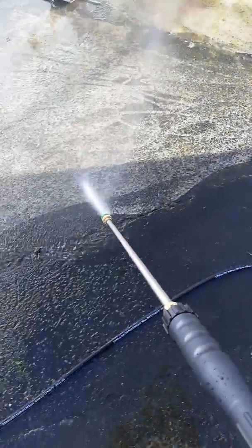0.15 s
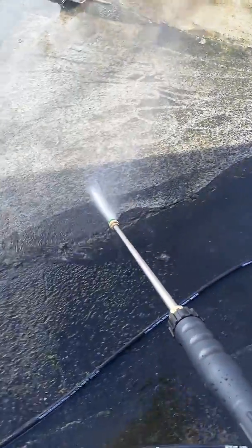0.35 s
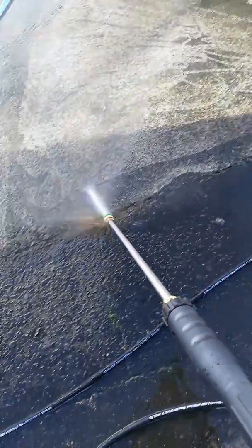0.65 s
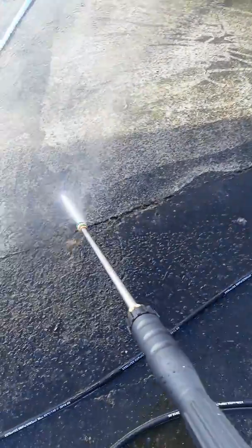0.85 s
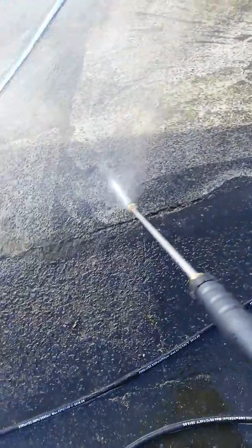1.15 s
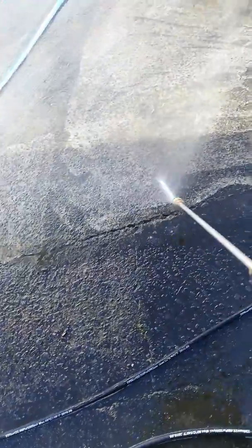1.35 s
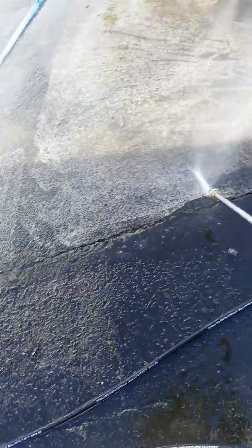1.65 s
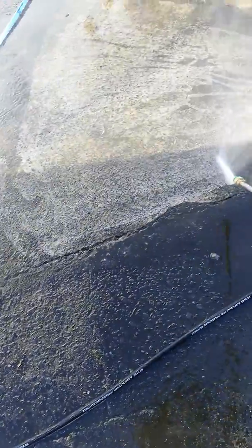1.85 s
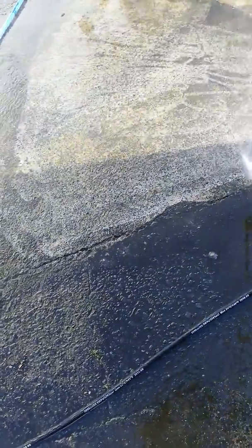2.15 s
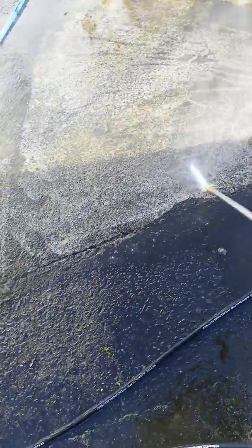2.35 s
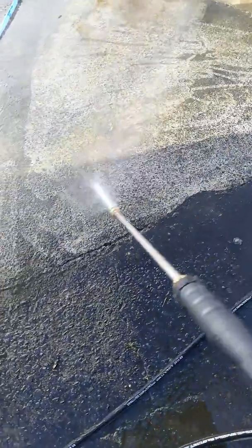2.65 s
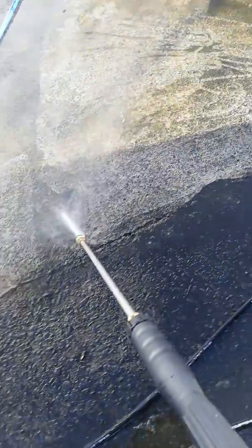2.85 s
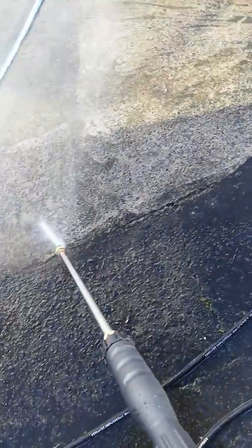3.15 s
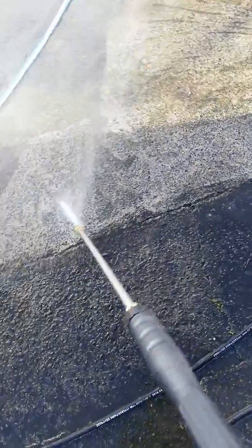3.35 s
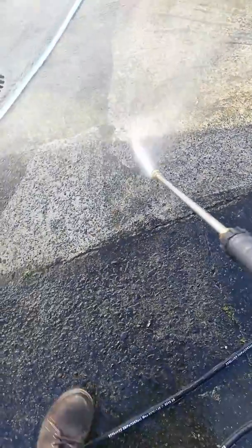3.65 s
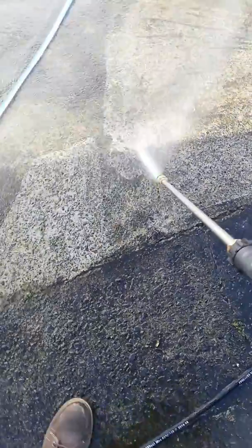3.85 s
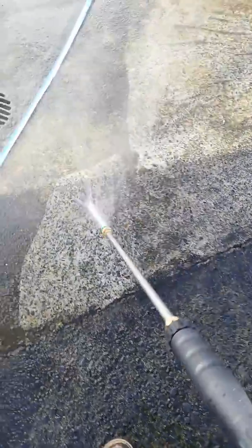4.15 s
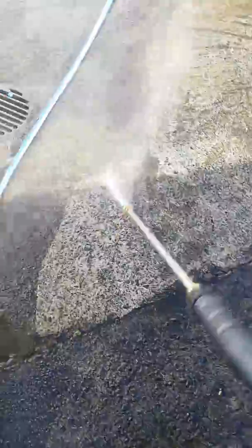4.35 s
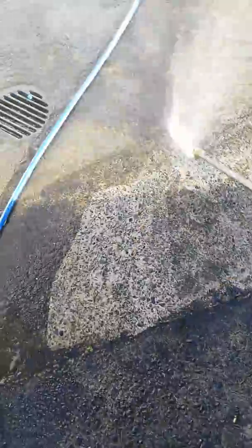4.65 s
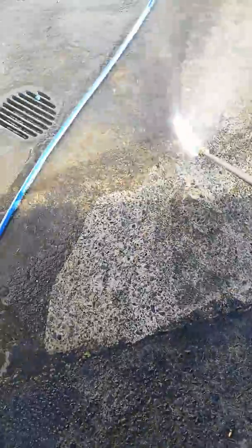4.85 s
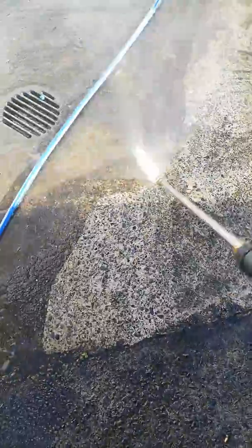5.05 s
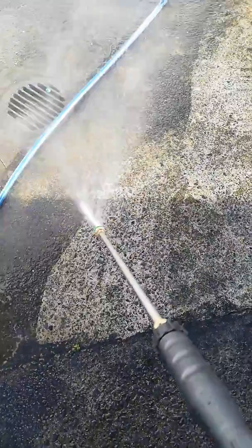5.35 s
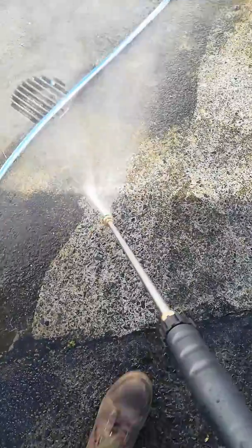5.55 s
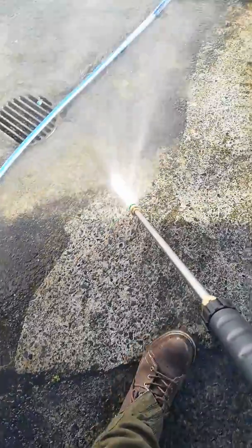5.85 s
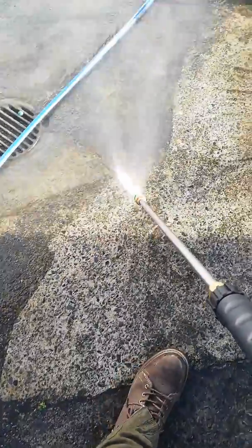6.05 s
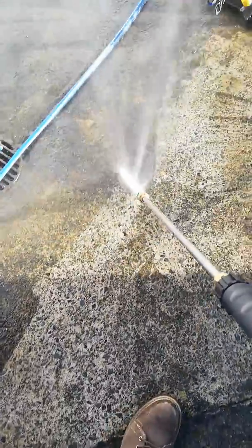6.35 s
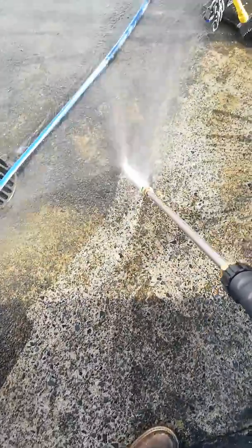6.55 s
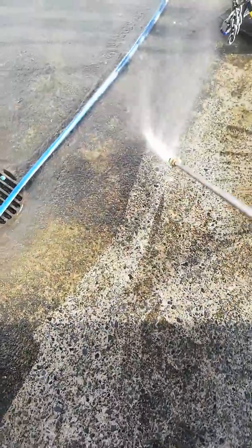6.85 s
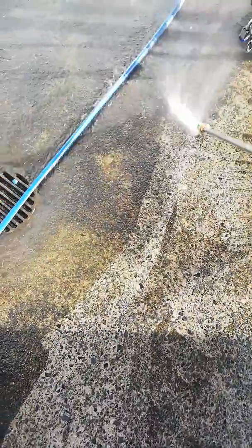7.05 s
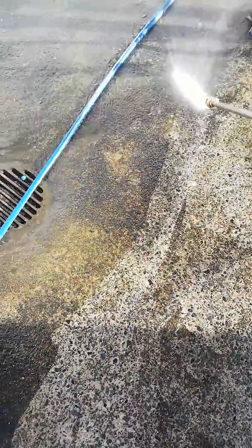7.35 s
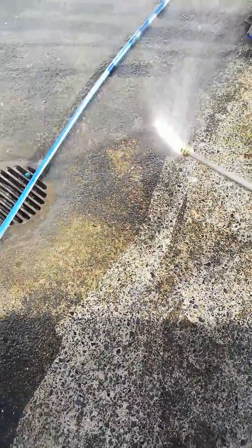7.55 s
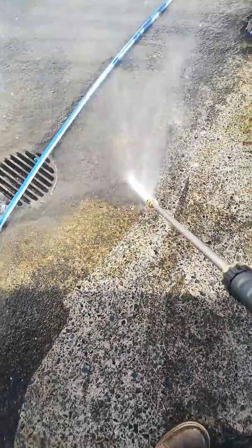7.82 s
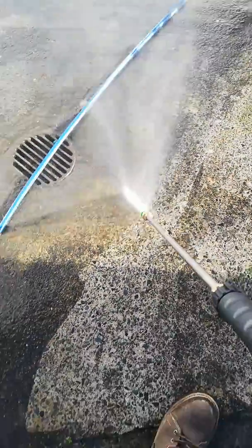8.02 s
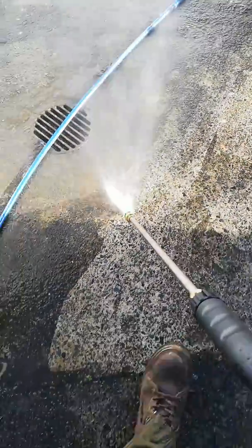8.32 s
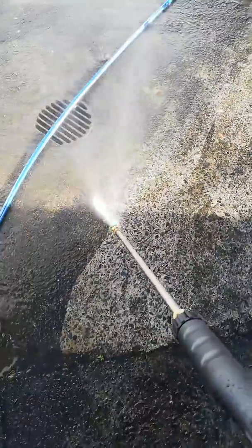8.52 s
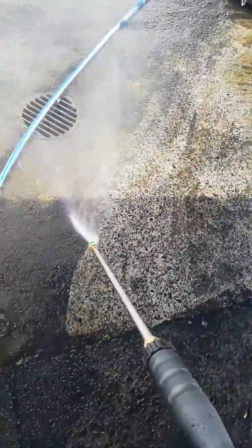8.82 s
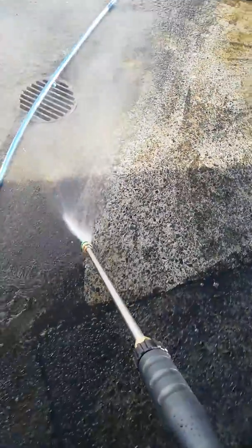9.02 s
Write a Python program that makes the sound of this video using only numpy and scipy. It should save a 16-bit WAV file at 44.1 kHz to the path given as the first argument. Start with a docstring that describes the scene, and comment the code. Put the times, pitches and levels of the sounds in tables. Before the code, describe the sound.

A pressure washer jet hisses loudly over wet concrete while its petrol engine drones and rattles steadily behind it.

```python
"""The jet of a petrol pressure washer hisses and roars as it is swept over wet concrete outdoors.
Its spray is broadband noise, modulated in amplitude by the pressure ripple of the pump.
Behind it the single cylinder thumps in a harmonic series on the firing rate, while pump and valves
knock at fixed crank angles and excite the damped modes of the casing.
Two spaced microphone ports receive each source with a different colour and phase."""
import sys
import numpy as np
from scipy import signal
from scipy.io import wavfile
from scipy.ndimage import uniform_filter1d

SR = 44100
rng = np.random.default_rng(int(sys.argv[2]) if len(sys.argv) > 2 else 0)


def generate_wav(sig):
    """Save sig (samples, or channels by samples) to the path in sys.argv[1] as 16-bit PCM at SR."""
    pcm = np.round(np.clip(np.atleast_2d(sig).T, -1, 1) * 32767).astype(np.int16)
    wavfile.write(sys.argv[1], SR, pcm)


N = 404838

# Knocks in one four-stroke cycle: (position [cycles], level [dB], spectral tilt [dB/octave])
KNOCK_PATTERN = [(.05, 0, 3), (.2, -7.5, 0.5), (.31, -9, 0), (.44, -1, -4), (.57, 1.5, -0.5), (.72, 3.5, 3),
                 (.83, -5, -5.5), (.97, -2, 1.5)]
# Relation between the ports: (frequency [Hz], coherence [0-1], phase lead of the left [rad])
PORT_COHERENCE = [(100, .99, .05), (300, .85, .2), (700, .45, 1.7), (950, .6, .2), (1900, .55, .1),
                  (2500, .5, 2.6), (3500, .3, 3.3), (4500, .44, 4.2), (5500, .44, 5.9), (6500, .32, 7.9),
                  (7500, .2, 8.7), (8500, .27, 10.7), (10000, .24, 13.4), (12000, .14, 19.6),
                  (14000, .1, 23.2)]
# Base level of the machine as it draws nearer: (time [s], level [dB])
MACHINE_LEVEL = [(0, -27.5), (2.6, -28), (4.7, -26.5), (7.9, -26.5), (9.18, -26)]
# Low-mid swell, followed in part by exhaust buzz and spray roar: (time [s], level [dB])
LOW_MID_SWELL = [(0, -0.5), (.6, -3), (1.2, -2.5), (1.7, -6.5), (2.5, -4), (2.9, -0.5), (3.6, 1),
                 (4.8, 0.5), (6.8, 0.5), (8.4, 1.5), (9.18, 2.5)]


def gain_of(db):
    """Amplitude ratio of a level in decibels."""
    return 10 ** (np.asarray(db) / 20)


def follow(rows, t):
    """Linear interpolation of each column of a time table at the times t."""
    times, *columns = np.transpose(rows)
    return [np.interp(t, times, c) for c in columns]


def read(rows, hz):
    """Interpolation of each column of a spectrum table on a logarithmic frequency axis."""
    freqs, *columns = np.transpose(rows)
    return [np.interp(np.log(hz + 1), np.log(freqs + 1), c)[:, None] for c in columns]


def drift(shape, spans):
    """Slow random fluctuation of rms 1: noise under a double moving average along each axis."""
    x = rng.standard_normal(shape)
    for axis, span in enumerate(spans):
        x = uniform_filter1d(uniform_filter1d(x, span, axis=axis), span, axis=axis)
    return x / np.sqrt(np.mean(x ** 2) + 1e-20)


def engine_cycles():
    """Phase as the integral of speed: one four-stroke cycle for every two crank turns."""
    # The governor hunts a little: (time [s], crank speed [turns/s])
    crank_speed = [(0.0, 61.62), (0.88, 61.19), (2.27, 61.35), (2.75, 61.41), (3.19, 61.17), (3.97, 61.59),
                   (4.71, 61.22), (5.14, 61.45), (5.78, 61.26), (8.06, 61.22), (8.3, 61.19), (9.18, 61.41)]
    return .6 + np.cumsum(follow(crank_speed, np.arange(N) / SR)[0]) / SR / 2


def exhaust_harmonics(cycle):
    """Fourier series: periodic firing gives tones at whole multiples of the firing rate."""
    # Spectra facing the machine and turned away from it: (harmonic [number], level [dB])
    spectrum_facing = [(1, -12), (2, 1), (3, -11.5), (4, -34), (5, -10.5), (6, -12.5), (7, -31), (8, -11.5),
                       (9, -27.5), (10, -44), (11, -13.5), (12, -24), (13, -18), (14, -13.5), (15, -22),
                       (16, -14), (17, -22.5), (18, -14.5), (19, -15.5), (20, -12.5), (21, -13), (22, -45),
                       (23, -25.5), (24, -16), (25, -32), (26, -10), (27, -30), (28, -14), (29, -26),
                       (30, -13.5), (31, -14), (32, -8.5), (33, -35.5), (34, -48), (35, -26), (36, -21.5),
                       (37, -18), (38, -7), (39, -20), (40, -18), (41, -17), (42, -13)]
    spectrum_away = [(1, -12), (2, -1), (3, -10), (4, -34), (5, -12.5), (6, -9.5), (7, -23.5), (8, -14),
                     (9, -20), (10, -20), (11, -24), (12, -29), (13, -20.5), (14, -23), (15, -21.5),
                     (16, -23.5), (17, -14.5), (18, -26), (19, -12.5), (20, -22), (21, -33), (22, -21),
                     (23, -17), (24, -12.5), (25, -24), (26, -20), (27, -13), (28, -28), (29, -23),
                     (30, -14), (31, -33), (32, -13.5), (33, -13), (34, -35), (35, -14), (36, -10),
                     (37, -37), (38, -18.5), (39, -14.5), (40, -27), (41, -37), (42, -18)]
    # Turn toward the machine: (time [s], share [0-1])
    orientation = [(2.5, 0.2), (3.3, 0.72)]
    # Tops of the thump, two hum, drone, growl and buzz bands, below the whine: (harmonic [number])
    band_tops = [4, 5, 7, 8, 11, 23]
    # Hums near 150 and 185 Hz: (time [s], lower level [dB], upper level [dB])
    hums = [(0, -1, 0), (.6, 2.5, 1.5), (3.5, 2.5, 3), (4.1, -1.5, -9), (5, -3, -8), (5.5, -2, 0.5),
            (7, -0.5, 1), (7.4, -0.5, -3), (8.1, -2, 2), (9.18, -3, -7)]
    # Drone at 245 Hz, growl near 330 Hz and whine near 1000 Hz: (time [s], level [dB])
    drone = [(0, 9.5), (.28, 8), (.7, -7), (1.12, -12), (1.99, 5.5), (2.6, -14), (3.58, 3.5), (4.75, -1),
             (4.9, 2.5), (5.5, 4), (5.85, -2.5), (7.49, -0.5), (7.58, 4), (8.5, 2), (8.9, 6), (9.03, 0),
             (9.18, 7)]
    growl = [(0, 7.5), (.7, -5), (2.1, 5), (2.7, -4), (3.3, 2.5), (4.2, -3), (4.9, 3.5), (6.9, -6),
             (8.2, 1.5), (9.18, 8.5)]
    whine = [(0, -3), (.6, -0.5), (1.7, -2), (3.3, -1), (4.7, -1), (5.5, 4.5), (6.2, -0.5), (8.3, 1),
             (8.85, 3.5), (9.18, -0.5)]
    # Balance of the tones: (frequency [Hz], left above right [dB])
    balance = [(150, 0), (380, -2), (700, 3), (1000, 7.5), (1290, -2)]
    hop, firing_hz = 64, 30.65
    blast_position, muffler_lag_rad, muffler_smear_rad = 0.887, 1.36, 0.2766
    t = np.arange(0, N, hop) / SR
    machine_db, drone_db, growl_db, mids_db, whine_db = (
        follow(rows, t)[0] for rows in (MACHINE_LEVEL, drone, growl, LOW_MID_SWELL, whine))
    band_db = [0, *follow(hums, t), drone_db, growl_db, 0.62 * mids_db, whine_db]
    k, facing_db = np.transpose(spectrum_facing)
    facing = follow(orientation, t)[0]
    harmonic_db = np.outer(facing_db, facing) + np.outer(np.transpose(spectrum_away)[1], 1 - facing)
    depth = np.clip(0.19 * k - .4, 0, 2.0)[:, None]  # higher harmonics waver more
    waver = drift((len(t), len(k), 3), spans=(180, 1)) * depth
    balance_db = read(balance, firing_hz * k)[0]
    lead = read(PORT_COHERENCE, firing_hz * k)[1]
    # Low harmonics take their phase from the muffled blast; the upper ones peak on the knocks.
    position, knock_db, tilt = np.transpose(KNOCK_PATTERN)
    knock_gain = gain_of(knock_db + np.outer(np.log2(k / 62), tilt))
    knock_spectrum = (knock_gain * np.exp(-2j * np.pi * np.outer(k, position))).sum(axis=1)
    blast_phase = -2 * np.pi * blast_position * k + muffler_smear_rad * k ** 2 - muffler_lag_rad
    phase = np.where(k > band_tops[3], np.angle(knock_spectrum), blast_phase)
    side, out = np.array([[.5], [-.5]]), np.zeros((2, N))
    for i, band in enumerate(np.searchsorted(band_tops, k)):
        side_db = side * (balance_db[i] + waver[:, i, 1])
        gain = gain_of(machine_db + harmonic_db[i] + band_db[band] + waver[:, i, 0] + side_db)
        # Reflections shift the phase between the ports.
        skew = side * (lead[i] + 0.37 * waver[:, i, 2]).repeat(hop)[:N]
        out += gain.repeat(hop, axis=1)[:, :N] * np.cos(2 * np.pi * k[i] * cycle + phase[i] + skew)
    return np.sqrt(2) * out


def casing_resonance(cycle):
    """Modal resonance: knocks at fixed crank angles, each with a rattle, excite damped vibrations."""
    # Lower, upper and loose-part modes: (frequency [Hz], T60 [s], left level [dB], right level [dB])
    mode_groups = [
        [(1518, 0.038, -6.5, -8), (1660, 0.14, -22, -25)],
        [(1795, 0.044, 2.5, 8.5), (1860.5, 0.061, 0.5, 5.5), (1934, 0.073, -23, 9), (2043, 0.07, -30, 4.5),
         (2197, 0.03, -28, 10)],
        [(2590, .04, 6, -4), (2760, 0.034, 12, 0)],
    ]
    # Ringing relative to the machine: (time [s], lower group level [dB], upper group level [dB])
    ring_levels = [(0, -8, 1), (.9, -24, 3.5), (1.8, -2, 2), (2.7, -14, 5.5), (3.3, -31, 5.5),
                   (4.2, -17, 7.5), (4.6, -2, 3), (5.6, -11, 2.5), (6.1, 0.5, 3), (7.5, -0.5, 4.5),
                   (8.1, 1, 1.5), (8.5, -9, 0.5), (8.9, -8, 5), (9.18, -14, 1.5)]
    # The loose part buzzes in fits: (centre time [s], half length [s], relative level [dB])
    buzz_fits = [(.35, .15, -4), (1.9, 0.15, -7), (4.35, .08, -4), (4.8, .15, -3), (5.246, .1, -5),
                 (5.85, .1, -8), (7.246, 0.065, 0), (7.5, 0.12, -4), (8.2, .06, -3), (8.947, 0.18, -5)]
    t, ring_t = np.arange(N) / SR, np.arange(3000) / SR
    attack_s, antiphase_hz = 0.0013, 2400
    machine_db = follow(MACHINE_LEVEL, t)[0]
    lower_db, upper_db = follow(ring_levels, t)
    fits = sum(gain_of(db) * np.exp(-((t - centre) / half) ** 2) for centre, half, db in buzz_fits)
    position, knock_db, tilt = np.transpose(KNOCK_PATTERN)
    whole_cycles = np.arange(int(cycle[-1]) + 1)[:, None]
    jitter = rng.standard_normal((len(whole_cycles), len(position), 2))
    onsets = np.searchsorted(cycle, whole_cycles + position + .0006 * jitter[..., 0]).clip(0, N - 1)
    out = np.zeros((2, N))
    for modes, gain in zip(mode_groups, (gain_of(lower_db), gain_of(upper_db), gain_of(-6.5) + fits)):
        group = np.zeros((2, N))
        for hz, t60, *side_db in modes:
            blows = np.zeros(N)
            blows[onsets] = gain_of(knock_db + tilt * np.log2(hz / 1900) + 0.7 * jitter[..., 1])
            chatter = signal.lfilter([1], [1, -.995], blows)  # loose parts rattle on for some ms
            common, separate = rng.standard_normal((2, N)) * (0.39 + chatter)
            drive = blows + .017 * np.array([common, .6 * common + .8 * separate])
            envelope = gain_of(-60 * ring_t / t60) * (1 - np.exp(-ring_t / attack_s))
            ring = envelope * np.sin(2 * np.pi * hz * ring_t)
            port_gain = [[1], [1 if hz < antiphase_hz else -1]] * gain_of(side_db)[:, None]
            group += port_gain * signal.oaconvolve(drive, ring[None], axes=1)[:, :N]
        out += gain_of(machine_db - 1.0) * gain * group / np.std(group)
    return out


def water_jet(cycle):
    """Partly coherent noise: spray coloured by the wand's angle and modulated by the pump's ripple."""
    # Sweep of the wand: (time [s], position [-1 full left to 1 full right])
    wand_sweep = [(0, -.16), (1.1, -0.15), (1.85, 0.14), (2.6, -0.086), (3.3, -0.45), (3.85, 0.35),
                  (4.25, -0.44), (4.6, 0.42), (4.95, 0.42), (5.44, -0.43), (5.7, -.07), (6.3, 0.063),
                  (6.65, 0.15), (7, 0.6), (7.31, 0.94), (7.65, 0.56), (8, -0.26), (8.4, -0.019),
                  (8.85, -.47), (9.18, -0.061)]
    # Spray at the ports: (frequency [Hz], left level [dB], right level [dB])
    spray_spectrum = [(40, -8, -7), (130, -12, -10), (260, -3.5, -6.5), (400, -14.5, -8.5), (690, 1, -8.5),
                      (1040, 2, 3), (1370, -0.5, 0.5), (1900, 1.5, 7), (2310, 2.5, 6.5), (3380, 2.5, 1.5),
                      (4320, 1.5, 2.5), (5900, 0.5, 1), (7180, 3, -4.5), (8800, 6, 0.5), (10450, 1.5, 5),
                      (12400, -3.5, -4), (13200, -6, -1), (15600, -7.5, -11)]
    # Change of colour at full swing and during one long reach to the far side:
    # (frequency [Hz], swing left [dB], swing right [dB], reach left [dB], reach right [dB])
    angle_colour = [(2000, 0, 1.5, -0.5, -1), (4000, 0.5, -1, -0.5, -0.5), (5500, 1, 1.5, 0.5, 2),
                    (7500, -1.5, 3, 1.5, 2), (9250, -0.5, -3, 0, 1.5), (11500, -2, 0, 2, 4.5),
                    (12800, -2, -6, 1, 4.5), (14000, -2, -5, 3, -3), (15600, -3, -3, 1, -3)]
    # Slow course of the hiss: (time [s], relative level [dB])
    hiss_level = [(0, -21.5), (.64, -20.5), (1.7, -21.5), (2.9, -21), (3.4, -21), (4.2, -21), (5.5, -21),
                  (6.5, -20), (7.4, -21), (7.95, -20.5), (8.65, -21.5), (9.18, -21)]
    reach_centre_s, half_hold_s, glide_s = 1.78, 0.51, 0.27
    swing_lead_s = 85e-6  # extra lead of the left port at full right
    size, hop = 1024, 256
    frames, hz = N // hop + 5, np.fft.rfftfreq(size, 1 / SR)
    t, grid = np.arange(frames) * hop / SR, (frames, len(hz))
    swing = follow(wand_sweep, t)[0]
    reach = np.clip((half_hold_s - abs(t - reach_centre_s)) / glide_s + 1, 0, 1)
    roar_band = read([(900, 1), (2000, 0)], hz)[0]  # fades out from 900 to 2000 Hz
    level_db = follow(hiss_level, t)[0] + 0.83 * roar_band * follow(LOW_MID_SWELL, t)[0]
    level_db += 0.45 * drift((frames, 1), spans=(2, 1)).T  # the whole hiss flickers
    level_db += .5 * drift(grid, spans=(3, 40)).T  # and so do patches of its spectrum
    noise = rng.standard_normal((*grid, 4)).T
    common, separate = noise[::2] + 1j * noise[1::2]
    left_db, right_db = read(spray_spectrum, hz)
    swing_left, swing_right, reach_left, reach_right = read(angle_colour, hz)
    left_db = left_db + swing_left * swing + reach_left * reach + 0.76 * drift(grid, spans=(30, 14)).T
    right_db = right_db + swing_right * swing + reach_right * reach + 1.8 * drift(grid, spans=(30, 14)).T
    coherence, lead = read(PORT_COHERENCE, hz)
    lead = lead + 2 * np.pi * hz[:, None] * swing * swing_lead_s
    left = common * np.exp(1j * lead) * gain_of(left_db)
    right = (coherence * common + np.sqrt(1 - coherence ** 2) * separate) * gain_of(right_db)
    spectra = np.array([left, right]) * gain_of(level_db)
    spray = signal.istft(spectra, nperseg=size, noverlap=size - hop)[1][:, :N]
    ripple_db = sum(depth_db * np.cos(2 * np.pi * harmonic * (cycle - crest))
                    for harmonic, depth_db, crest in [(1, 0.35, .27), (2, 0.48, .25), (6, 0.22, .07)])
    return gain_of(-19.5 + ripple_db) * spray


def scene():
    """Superposition of exhaust, casing and jet, all locked to one engine cycle."""
    cycle = engine_cycles()
    return exhaust_harmonics(cycle) + casing_resonance(cycle) + water_jet(cycle)


def record(dry):
    """Band limiting: a steep linear-phase low-pass filter removes the highest treble."""
    low_pass = signal.firwin(1023, cutoff=15850, window=("kaiser", 9), fs=SR)
    return signal.oaconvolve(dry, low_pass[None], "same")


dry = scene()
out = record(dry)
generate_wav(out)
```